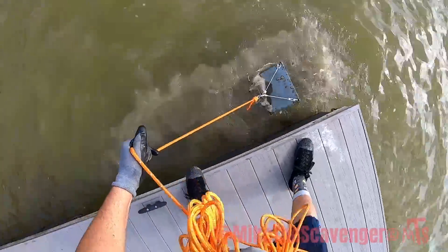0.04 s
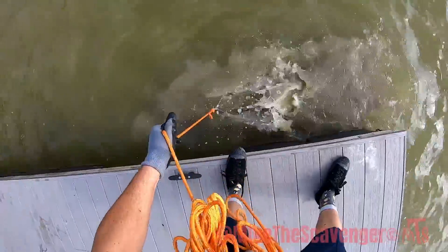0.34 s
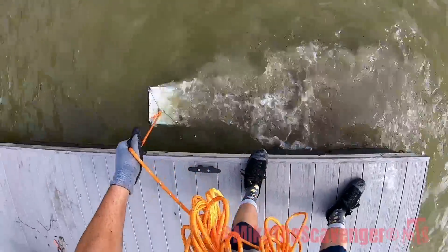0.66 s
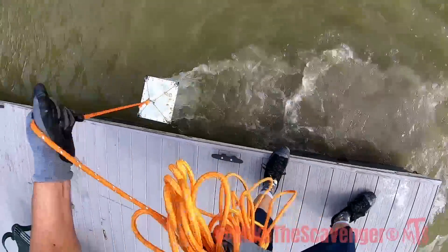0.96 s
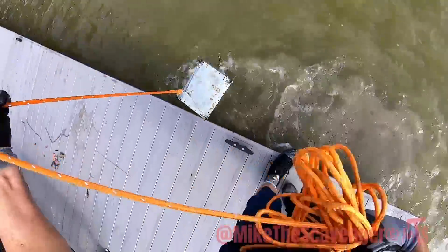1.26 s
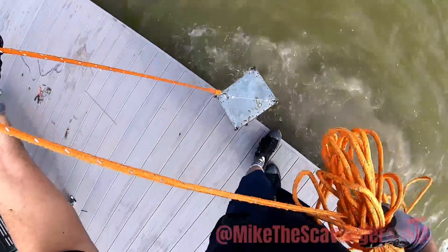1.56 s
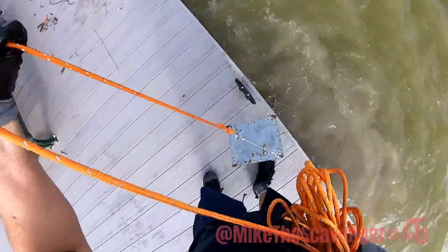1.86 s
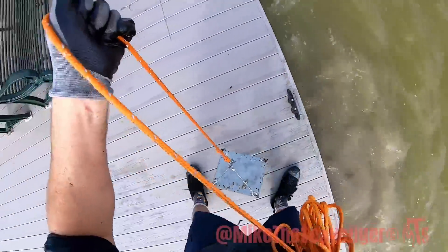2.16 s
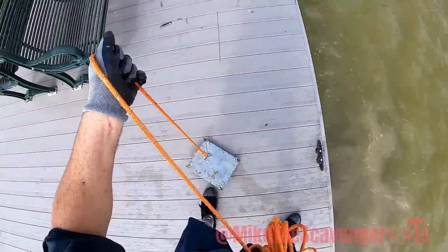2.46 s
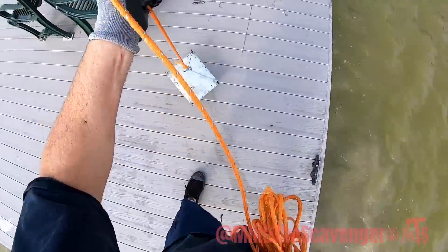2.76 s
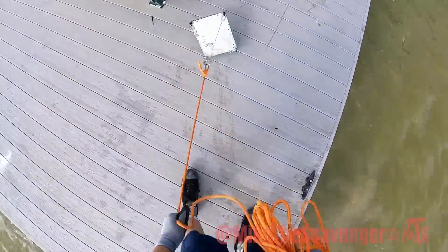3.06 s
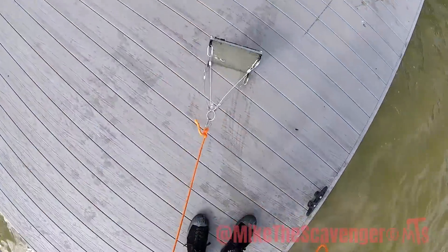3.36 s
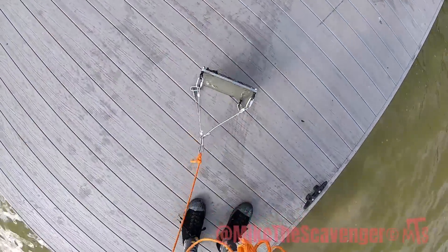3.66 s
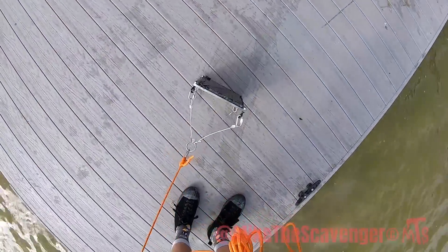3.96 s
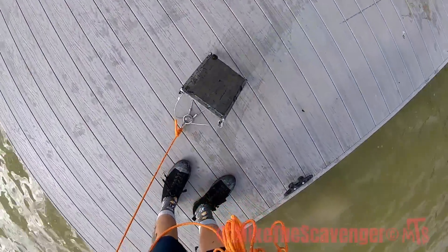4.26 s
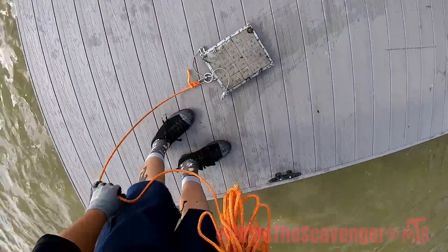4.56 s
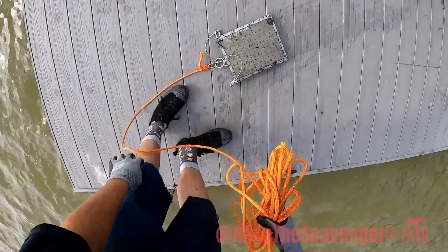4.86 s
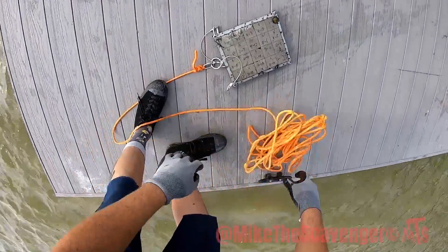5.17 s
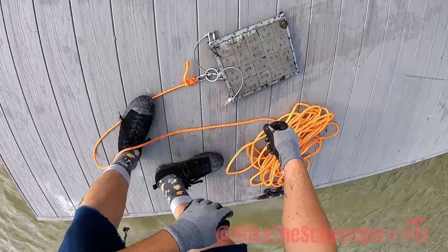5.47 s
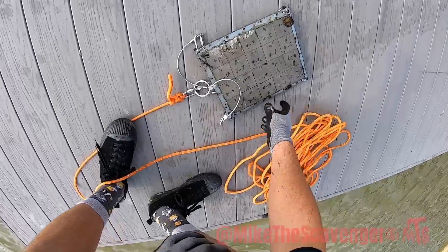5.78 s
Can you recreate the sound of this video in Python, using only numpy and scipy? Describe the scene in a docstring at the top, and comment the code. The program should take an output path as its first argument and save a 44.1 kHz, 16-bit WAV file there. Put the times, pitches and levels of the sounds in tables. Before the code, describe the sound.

A wire-mesh trap is hauled out of the water with a bubbling splash, then streams and drips. It clanks down on a plank dock, scrapes and tumbles over the boards with hollow knocks, and falls flat with a loud clank and a few bounces. Soft footsteps and a faint rustle of dropped rope follow. Light wind rumbles on the nearby microphone throughout.

```python
"""Plank dock by open water, light wind rumbling throughout. A wire-mesh trap is hauled out on its rope:
bubbles ring as it splashes, streams and drips. It touches down, scrapes and tumbles over the boards,
then falls flat and bounces; each blow rings the steel frame, a plank and the booming deck.
Feet shift and the rope coil drops beside it. The stereo image narrows during the tumble."""
import sys
import numpy as np
from scipy import signal
from scipy.fft import rfft, irfft, next_fast_len
from scipy.io import wavfile
from scipy.ndimage import uniform_filter1d, minimum_filter1d, map_coordinates

SR = 44100
rng = np.random.default_rng(int(sys.argv[2]) if len(sys.argv) > 2 else 0)


def store_pcm(level_fs):
    """Save levels as 16-bit WAV."""
    pcm = np.round(np.clip(level_fs, -1, 1) * 32767).astype(np.int16)
    wavfile.write(sys.argv[1], SR, np.atleast_2d(pcm).T)


N = 256882
TIME_S = np.arange(N) / SR

# Event levels are relative within each table; spectra give level per Hz.
# wind strength: t/s, level/dB, left-right/dB
BREEZE = [(0, -33.5, 0), (.6, -33, -5.5), (1.2, -33.5, 8.5), (2.4, -33, -4), (4.2, -39, -6),
          (5.7, -41.5, -1.5)]
# wind buffet spectrum: f/Hz, level/dB
BUFFET_SPECTRUM = [(15, -24.5), (35, -3), (90, -1), (140, -7), (220, -12.5), (400, -34), (5000, -115)]
# open-water wash spectrum: f/Hz, level/dB
WASH_SPECTRUM = [(100, -3.5), (250, 4.5), (1000, -9.5), (1800, -14), (6500, -35), (11000, -70.5)]
# soft footfalls: t/s, level/dB
FOOTFALLS = [(4.899, -22), (4.966, -25), (5.04, -26.5)]
# rope coil landing and sliding: t/s, length/s, swish/dB, thud/dB
ROPE_STROKES = [(5.205, 0.24, -56.5, -30), (5.34, 0.32, -58.5, -47), (5.592, 0.25, -59, -41)]
# drops hitting the water: t/s, level/dB, nominal bubble f/Hz
DROPS = [(1.166, -14, 3430), (1.232, -26.5, 2640), (1.466, -19.5, 3730), (1.582, -27.5, 2670),
         (1.77, -22, 7000), (2.1466, -33.5, 3150)]
# large air pockets: t/s, level/dB, start f/Hz, end f/Hz, length/s
AIR_POCKETS = [(0.078, -35.5, 524, 393, 0.052), (0.319, -23, 332, 410, 0.011), (.372, -26, 453, 555, 0.024),
               (0.433, -23, 225, 400, 0.045), (0.928, -36.5, 1170, 644, 0.0424),
               (1.213, -34, 200.3, 182, 0.27), (1.773, -30.5, 397, 1030, 0.059)]
# water thrown or running off the trap: crest t/s, spray/dB, churn/dB, swell/s, ebb/s
WATER_SURGES = [(.01, -36, -37, 0.026, 0.14), (0.176, -32.5, -42, 0.11, 0.63),
                (0.462, -27.5, -25.5, 0.23, 0.53), (0.712, -31.5, -33, 0.19, 0.16),
                (.96, -62, -37.5, 0.025, 0.44), (1.19, -37.5, -40.5, 0.9, 1), (1.75, -45, -70, 0.42, 0.3)]
# small-bubble spray spectrum: f/Hz, level/dB
SPRAY_SPECTRUM = [(590, -13), (1000, -11.5), (1380, -5), (1970, -3.5), (3490, -2.5), (6120, -9.5),
                  (6950, -7), (9360, -12.5), (10400, -22.5), (15500, -35)]
# big-bubble churn spectrum: f/Hz, level/dB
CHURN_SPECTRUM = [(110, -11.5), (220, -3.5), (380, -1.5), (800, -6), (1500, -8), (2400, -18), (9000, -100)]
# wires and rope fittings catching: t/s, level/dB
WIRE_TICKS = [(2.8473, -34), (2.854, -28.5), (2.868, -28), (2.8947, -27.5), (3.521, -38), (5.256, -49),
              (5.3145, -41.5), (5.352, -43)]
# short slides of the frame's edge: t/s, length/s, rasp/dB, ring/dB
EDGE_SKIDS = [(2.826, 0.137, -46.5, -59.5), (3.284, 0.057, -25.5, -42), (3.329, 0.031, -38.5, -35.5),
              (4.481, .02, -41, -49)]
# edge rasp spectrum: f/Hz, level/dB
RASP_SPECTRUM = [(400, -41), (800, -3), (1700, -9.5), (2400, 0.5), (3250, 0.5), (4700, -11), (9500, -30),
                 (15500, -58)]
# frame rubbing the boards: t/s, effort/dB
DRAG_EFFORT = [(2.5, -46), (2.66, -49.5), (2.89, -34), (2.99, -44), (3.5, -36), (3.61, -25.5),
               (3.67, -26.5), (3.75, -34), (3.9, -65.5), (4.37, -46), (4.53, -32), (4.76, -41),
               (4.85, -63.5)]
# deck rumble spectrum: f/Hz, level/dB
RUMBLE_SPECTRUM = [(30, -3.5), (48, -15.5), (65, -0.5), (135, -8.5), (200, -13), (3000, -115)]
# judder spectrum of the grooved boards: f/Hz, level/dB
GROOVE_SPECTRUM = [(170, 3), (620, -1), (790, -9.5), (1150, -12.5), (1500, -27), (9000, -82)]
# steel-on-wood scrape spectrum: f/Hz, level/dB
SCRAPE_SPECTRUM = [(400, -19), (720, -4.5), (1150, -10), (1650, -9), (2400, -8.5), (3400, -9), (4700, -9.5),
                   (6200, -19.5), (15000, -44.5)]
# frame striking the boards: t/s, clank/dB, boom/dB, knock/dB, knock tilt/(dB/octave)
BLOWS = [(2.268, -50, -40, -24, 2), (2.496, -13.5, -18.5, -28, 7), (3.098, -18, -14.5, -15.5, 0),
         (3.199, -19.5, -17, -15, -2.5), (3.213, -24, -23.5, -18, 1), (3.281, -21, -22, -22.5, 1),
         (3.334, -19.5, -15, -11.5, -2), (3.345, -8.5, -19.5, -14, -5), (3.447, -23, -16, -16, -2.5),
         (3.453, -16, -15, -23.5, 10.5), (3.543, -18, -15, -26.5, 20.5), (3.575, -22, -25, -23, 8),
         (3.593, -27, -29, -22, -0.5), (3.622, -28, -18, -17.5, 1), (3.811, -32.5, -20.5, -32, 10),
         (4.327, -25.5, -53, -31, 1), (4.347, -17.5, -46, -28.5, 17), (4.498, -4, -20, -14, 12),
         (4.51, -9.5, -27.5, -7, -4.5), (4.622, -24, -20, -22.5, -0.5), (4.652, -14.5, -20.5, -23.5, 8),
         (4.655, -20.5, -20, -8, -0.5), (4.73, -29.5, -19.5, -19, 1), (4.765, -46, -20.5, -21, -2)]
# crack and mesh buzz spectrum: f/Hz, level/dB
CLICK_SPECTRUM = [(400, -55.5), (800, 7.5), (2100, 4.5), (2800, -2), (4700, -2), (6000, -13), (8500, -21.5),
                  (11000, -30), (15500, -67)]
# plank clatter spectrum: f/Hz, level/dB
CLATTER_SPECTRUM = [(100, -29), (200, 1), (330, -6), (450, -8.5), (590, -9.5), (1100, -30), (1600, -57),
                    (12000, -110)]
# whole-deck modes: f/Hz, level/dB, t60/s
DECK_MODES = [(64.4, -0.5, 0.74), (73, -7.5, 0.25), (94.5, 5.5, 0.095), (127.8, 0.5, 0.26)]
# single-plank modes: f/Hz, level/dB, t60/s
PLANK_MODES = [(146, 5.5, 0.14), (179.8, 6.5, 0.12), (219.8, 0.5, 0.29), (264.3, 2, 0.14), (319.3, 0, 0.17),
               (389, -1, 0.14), (437.3, -5, 0.14), (588.5, -7, 0.13), (664.6, -7.5, 0.12), (810, -3, 0.031)]
# struck steel frame modes: f/Hz, level/dB, t60/s
STEEL_MODES = [(773, 11.5, 0.089), (1001, 9.5, 0.06), (1156, 11.5, 0.1), (1396, 4.5, 0.047),
               (2000, 9.5, 0.074), (2385, 4, 0.069), (2900, 6, 0.081), (3330, 5.5, .07), (4680, -3, 0.051)]
# left-right likeness: f/Hz, correlation
COHERENCE = [(30, 0.43), (200, 0.95), (700, 0.57), (2500, 0.81), (5000, 0.86), (10000, 0.3)]
# microphone mismatch: f/Hz, left-right/dB
MIC_BALANCE = [(100, 0.5), (500, -2.5), (2000, -2.5), (4500, -1), (7200, -9.5), (11000, 1.5)]
# width left in the narrowed image: f/Hz, side gain/dB
NARROW_WIDTH = [(100, -69), (4000, -16), (13000, -5)]

BOARD_DETUNE, STEEL_DETUNE = 0.033, 0.018  # relative pitch scatter per contact


def amp(db):
    """Decibels to gain."""
    return 10 ** (np.asarray(db) / 20)


def unit(x):
    """Scale to rms 1."""
    return x / np.sqrt(np.mean(x ** 2) + 1e-20)


def panned(x, db):
    """Left louder than right by db."""
    return x * amp(np.array([[.5], [-.5]]) * db)


def along(points, hz):
    """Interpolate (f/Hz, value) points on a log axis."""
    f, value = np.transpose(points)
    return np.interp(np.log(hz + 1), np.log(f + 1), value)


def levels(rows):
    """Gain per sample for each dB column, fading 60 dB/s beyond the rows."""
    t_s, *columns = np.transpose(rows)
    outside_s = np.maximum(t_s[0] - TIME_S, 0) + np.maximum(TIME_S - t_s[-1], 0)
    return np.array([amp(np.interp(TIME_S, t_s, db) - 60 * outside_s) for db in columns])


def wobble(rate_hz):
    """Smooth random curve, knots at rate_hz."""
    return map_coordinates(rng.standard_normal(int(N * rate_hz / SR) + 4), [TIME_S * rate_hz])


def add(track, t_s, sound):
    """Mix a sound in at t_s."""
    part = track[..., max(round(t_s * SR), 0):][..., :sound.shape[-1]]
    part += sound[..., :part.shape[-1]]


def filtered(x, response):
    """Zero-phase filter with gain response(hz)."""
    n = x.shape[-1]
    size = next_fast_len(n + 8192)
    return irfft(rfft(x, size) * response(np.fft.rfftfreq(size, 1 / SR)), size)[..., :n]


def coloured(x, spectrum, size=4096):
    """Minimum-phase filter with the given spectrum."""
    cepstrum = irfft(np.log(amp(along(spectrum, np.fft.rfftfreq(size, 1 / SR)))))
    cepstrum[1:size // 2] *= 2
    cepstrum[size // 2 + 1:] = 0
    impulse = irfft(np.exp(rfft(cepstrum)))
    return signal.fftconvolve(x, impulse[None], axes=1)[:, :x.shape[1]]


def stereo(pair, spectrum):
    """Two unrelated signals to a coloured, partly coherent left and right, rms 1."""
    def mid_side_gains(hz):
        angle = np.arccos(np.clip(along(COHERENCE, hz), -1, 1)) / 2
        return np.array([np.cos(angle), np.sin(angle)])
    mid, side = coloured(filtered(pair, mid_side_gains), spectrum)
    return unit(np.array([mid + side, mid - side]))


def noise(size=N):
    """Two unrelated white noises."""
    return rng.standard_normal((2, size))


def grit(rate_hz, spread_db):
    """Noise broken into catches of uneven strength."""
    return noise() * amp(spread_db * wobble(rate_hz))


def modes(table, t, tilt_db_oct=0, detune=BOARD_DETUNE):
    """Damped modes, random in strength, tuning and pan; rms 1 over the first 25 ms."""
    hz, db, t60_s = np.transpose(table)[:, :, None]
    gain, shift, lean = rng.standard_normal((3, len(table), 1))
    sign = (-1) ** np.arange(len(table))[:, None]
    envelope = amp(db + tilt_db_oct * np.log2(hz / hz[0]) + 2 * gain - 60 * t / t60_s)
    ring = sign * envelope * np.sin(2 * np.pi * hz * (1 + detune * shift) * t)
    pair = panned(1, 0.83 * lean.T) @ ring
    return pair / np.sqrt(np.mean(pair[:, :SR // 40] ** 2))


def wind():
    """Wind buffets each microphone differently; a faint wash of open water follows its level."""
    breeze, lean = levels(BREEZE)
    gust_db = 0.78 * wobble(4.3) + 2.0 * np.array([wobble(7.9), wobble(8.7)])
    gusts = amp(gust_db) * stereo(noise(), BUFFET_SPECTRUM) * np.sqrt([lean, 1 / lean])
    wash = amp(-13.0) * stereo(noise(), WASH_SPECTRUM)
    return breeze * (gusts + wash)


def steps(board_hz=65, decay_s=0.017):
    """A board sags under each footfall and springs back."""
    out, t = np.zeros(N), np.arange(SR // 5) / SR
    envelope = np.exp(1 - t / decay_s) * (1 - np.exp(-t * board_hz * np.pi))
    for t_s, db in FOOTFALLS:
        add(out, t_s, amp(db) * envelope * np.sin(2 * np.pi * board_hz * t))
    return out


def rope():
    """Loops of rope patter onto the boards and slide over each other."""
    swish, thud = np.zeros((2, N))
    for t_s, length_s, swish_db, thud_db in ROPE_STROKES:
        stroke = signal.windows.hann(int(length_s * SR))
        add(swish, t_s, amp(swish_db) * stroke)
        add(thud, t_s, amp(thud_db) * stroke)
    fibres = stereo(grit(rate_hz=150, spread_db=1.5),
                    [(400, 8.0), (1000, 5.5), (2200, 10.0), (8000, -11.0), (14000, -33)])
    patter = stereo(grit(rate_hz=91, spread_db=3.0),
                    [(40, 9.0), (90, 3.0), (400, -9), (800, -14.0), (1500, -39), (9000, -100)])
    return swish * fibres + thud * patter


def drips():
    """Each drop ticks on the surface and traps a bubble that chirps upward."""
    out, t = np.zeros((2, N)), np.arange(SR // 20) / SR
    for t_s, db, hz in DROPS:
        age = t * hz / 22
        chirp = 0.955 + 0.055 * np.minimum(age, 2)
        ping = np.sin(2 * np.pi * hz * t * chirp) * np.exp(-3.5 * age) * (1 - np.exp(-t * hz))
        tick = 0.75 * noise(len(t)) * np.exp(-t / 0.0014)
        add(out, t_s, amp(db - 8.5) * (ping + tick))
    return coloured(out, [(7500, 8.0), (9500, -3.0), (15000, -34.5)])


def gulps():
    """Large air pockets gurgle, gliding in pitch as they change shape."""
    out = np.zeros(N)
    for t_s, db, start_hz, end_hz, length_s in AIR_POCKETS:
        progress = np.linspace(0, 1, int(length_s * SR))
        glide_hz = start_hz * (end_hz / start_hz) ** (progress ** 1.36)
        hz = glide_hz * (1 + 0.066 * wobble(350)[:len(progress)])
        envelope = amp(db) * np.sin(np.pi * progress ** 0.58)
        add(out, t_s, envelope * np.sin(2 * np.pi * np.cumsum(hz) / SR))
    return out * amp(3.1 * wobble(180))


def bubbles(count, centre_hz, octaves, q, spread_db, rise, size):
    """Steady bubble cloud as mid and side; each rings for size samples, its pitch climbing by rise."""
    start, pitch, strength, place = rng.random((4, count, 1))
    hz = centre_hz * 2 ** (octaves * (2 * pitch - 1))
    k = np.arange(size)
    cycles = hz * k / SR
    age = cycles / q
    envelope = np.exp(-np.pi * age) * (1 - np.exp(-cycles)) * (1 - k / size)
    gain = amp(spread_db * np.minimum(-np.log(1 - strength), np.pi)) * np.sqrt(hz / centre_hz)
    ring = gain * envelope * np.sin(2 * np.pi * cycles * (1 + rise * age / 2))
    index = ((start * N).astype(int) + k).ravel()
    side_gain = np.sqrt(3) * (2 * place - 1)
    return unit(np.array([np.bincount(index, (ring * g).ravel(), N + size)[:N] for g in (1, side_gain)]))


def surge(crest_s, swell_s, ebb_s, range_db=21):
    """Gain climbing range_db over swell_s to 1 at the crest, sinking as far over ebb_s."""
    return amp(-range_db * np.maximum((crest_s - TIME_S) / swell_s, (TIME_S - crest_s) / ebb_s))


def splash(churn_lead_s=0.025):
    """Big bubbles churn, then spray falls in a rush of small ones; droplets plink as the flow thins."""
    sprays, churns = [], []
    for crest_s, spray_db, churn_db, swell_s, ebb_s in WATER_SURGES:
        sprays.append(amp(spray_db) * surge(crest_s, swell_s, ebb_s))
        churns.append(amp(churn_db) * surge(crest_s - churn_lead_s, swell_s, ebb_s))
    spray, churn = np.linalg.norm([sprays, churns], axis=1)
    big = bubbles(3000, centre_hz=808, octaves=1.53, q=11.4, spread_db=3.0, rise=0.11, size=1400)
    small = bubbles(9500, centre_hz=3297, octaves=1.746, q=18.3, spread_db=3.0, rise=0.08, size=500)
    plinks = bubbles(520, centre_hz=4210, octaves=1.2, q=23, spread_db=3.5, rise=0.14, size=700)
    splats = bubbles(300, centre_hz=8300, octaves=0.88, q=7.1, spread_db=-1.0, rise=0, size=60)
    rush = spray * amp(2.8 * wobble(34.44)) * stereo(small + 1.47 * noise(), SPRAY_SPECTRUM)
    droplets = amp(-21) * spray ** 0.69 * stereo(plinks + 2.13 * splats, SPRAY_SPECTRUM)
    body = churn * stereo(big + 2.26 * noise(), CHURN_SPECTRUM)
    return body + rush + droplets


def ticks(t60_s=0.022):
    """Light metal contacts, too small to move the boards."""
    out, t = np.zeros((2, N)), np.arange(SR // 20) / SR
    for t_s, db in WIRE_TICKS:
        scuff = stereo(noise(len(t)), [(800, 2.5), (2500, 8), (6000, 4), (9500, -15), (14000, -43.5)])
        add(out, t_s, amp(db - 3.5) * scuff * amp(-60 * t / t60_s))
    return out


def singing(friction, tilt_db_oct, sustain=2.1):
    """Friction keeps the frame ringing, longer on its edge than under a blow; rms 1."""
    edge_modes = [(hz, db, t60_s * sustain) for hz, db, t60_s in STEEL_MODES]
    impulse = modes(edge_modes, np.arange(SR // 5) / SR, tilt_db_oct, STEEL_DETUNE)
    return unit(signal.fftconvolve(friction[:1], impulse, axes=1)[:, :N])


def skids():
    """An edge slides over a board with a bright rasp; the steel sings along."""
    rasp, ring = np.zeros((2, N))
    for t_s, length_s, rasp_db, ring_db in EDGE_SKIDS:
        stroke = signal.windows.tukey(int(length_s * SR), .25)
        add(rasp, t_s, amp(rasp_db - 2.0) * stroke)
        add(ring, t_s, amp(ring_db) * stroke)
    friction = grit(rate_hz=350, spread_db=2.0)
    return rasp * stereo(friction, RASP_SPECTRUM) + ring * singing(friction, tilt_db_oct=16)


def drag(hard_pull_db=-25, rumble_db=-18, scrape_db=-44.5, sing_db=-4, deck_t60_s=0.77):
    """One effort drives the deck's rumble, the judder over grooved boards and the steel's scrape."""
    pull, = levels(DRAG_EFFORT)
    effort = pull / amp(hard_pull_db)
    retained = amp(-60 / (deck_t60_s * SR)) ** 2  # energy lingers in the deck
    deck_energy = signal.lfilter([1 - retained], [1, -retained], effort ** 1.38)
    rumble = amp(rumble_db) * np.sqrt(deck_energy) * stereo(noise(), RUMBLE_SPECTRUM)
    judder = amp(-1.0) * pull * stereo(grit(rate_hz=190, spread_db=3.5), GROOVE_SPECTRUM)
    friction = stereo(grit(rate_hz=260, spread_db=4.0), SCRAPE_SPECTRUM)
    ring = amp(sing_db) * singing(friction, tilt_db_oct=1.5)
    scrape = amp(scrape_db) * effort ** 1.06 * (friction + ring)
    return rumble + judder + scrape


def knocks(contact_s=0.003, clatter_t60_s=0.088, crack_t60_s=0.017, mesh_t60_s=0.1):
    """Each blow clanks the frame, which flexes for contact_s; then a plank knocks and the deck booms."""
    out, t = np.zeros((2, N)), np.arange(SR // 2) / SR
    buzz = stereo(grit(rate_hz=450, spread_db=0), CLICK_SPECTRUM)
    attack = np.minimum(t / contact_s, 1) ** 2
    for t_s, clank_db, boom_db, knock_db, tilt_db_oct in BLOWS:
        boom = modes(DECK_MODES, t)
        plank = modes(PLANK_MODES, t, tilt_db_oct)  # corners excite high modes, the flat face low ones
        tilted = [(hz, db + tilt_db_oct * np.log2(min(hz, 1000))) for hz, db in CLATTER_SPECTRUM]
        clatter = stereo(noise(len(t)), tilted) * amp(-60 * t / clatter_t60_s)
        mesh = buzz[:, round(t_s * SR):][:, :len(t)] * amp(-60 * t / mesh_t60_s)
        crack = stereo(noise(len(t)), CLICK_SPECTRUM) * amp(-60 * t / crack_t60_s)
        ring = modes(STEEL_MODES, t, detune=STEEL_DETUNE)
        clank = attack * (1.6 * crack + 0.28 * mesh + 0.12 * ring)
        add(out, t_s, amp(boom_db + 0.5) * boom + amp(knock_db - 4) * (plank + 1.22 * clatter))
        add(out, t_s - contact_s, amp(clank_db - 7.0) * clank)
    return out


def narrowed(x, close_at_s=3.2, closing_s=0.015, open_at_s=4.71, opening_s=1):
    """The image folds almost to mono, then reopens; only the treble keeps some width."""
    mid, side = (x[0] + x[1]) / 2, (x[0] - x[1]) / 2
    closing = (TIME_S - close_at_s) / closing_s
    opening = (TIME_S - open_at_s) / opening_s
    closed = np.clip(np.minimum(closing, 1 - opening), 0, 1)
    treble_side = filtered(side, lambda hz: amp(along(NARROW_WIDTH, hz)))
    side = (1 - closed) * side + closed * treble_side
    return np.array([mid + side, mid - side])


def scene():
    """Water, then the trap on the dock, in open air."""
    water = splash() + gulps() + drips()
    trap = knocks() + ticks() + drag() + skids()
    return water + trap + steps() + rope() + wind()


def record(dry, top_hz=15700):
    """Microphone mismatch, narrowing, peak limiter, band limit."""
    heard = narrowed(filtered(dry, lambda hz: panned(1, along(MIC_BALANCE, hz))))
    needed_gain = 1 / np.maximum(np.abs(heard).max(axis=0), 1)
    limiter_gain = uniform_filter1d(minimum_filter1d(needed_gain, size=256), size=256)
    return filtered(heard * limiter_gain, lambda hz: hz < top_hz)


dry = scene()
out = record(dry)
store_pcm(out)
```